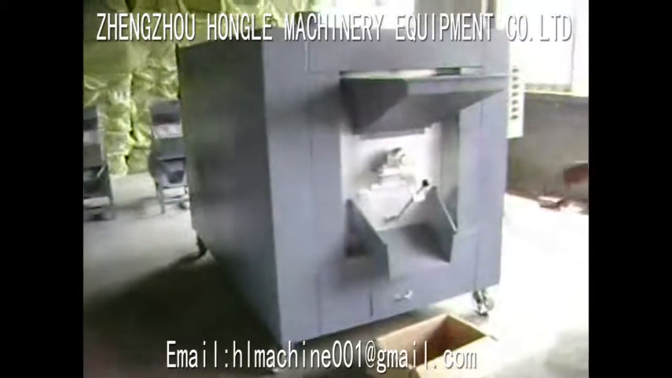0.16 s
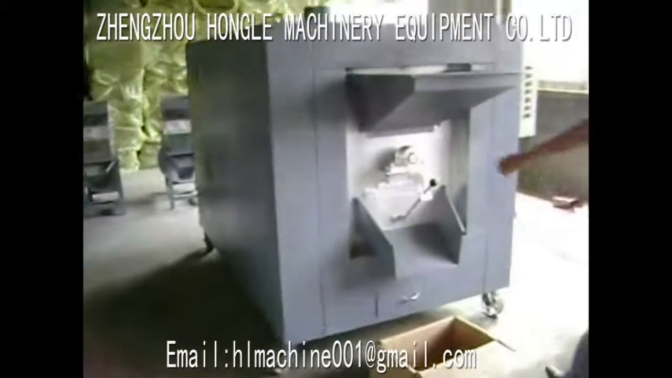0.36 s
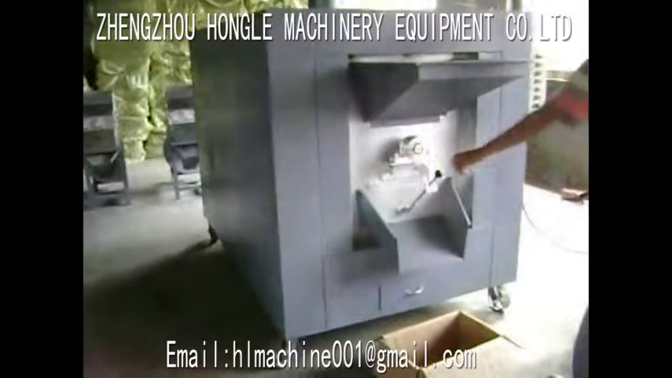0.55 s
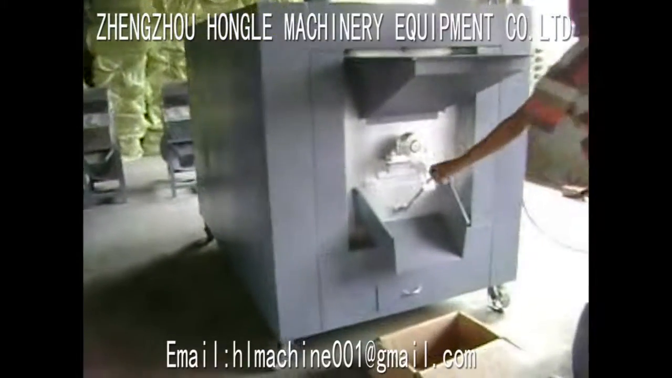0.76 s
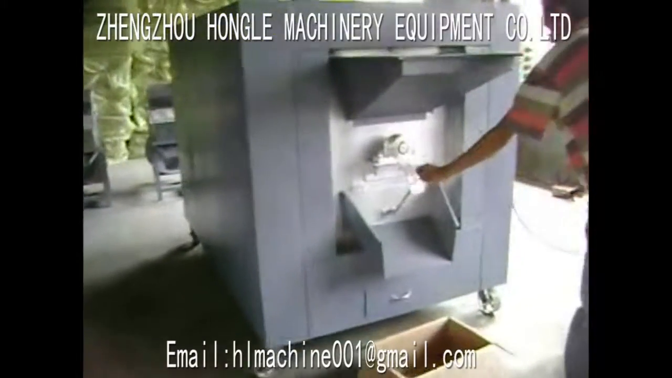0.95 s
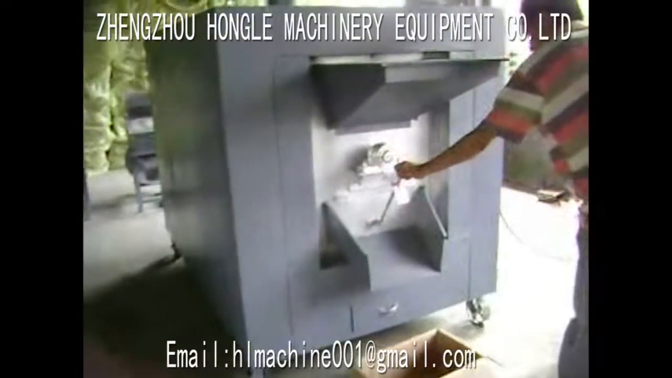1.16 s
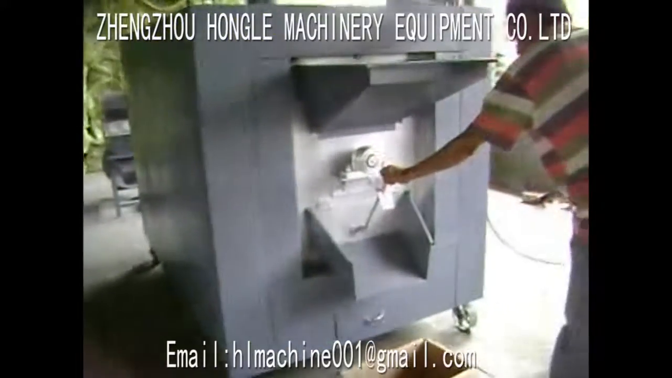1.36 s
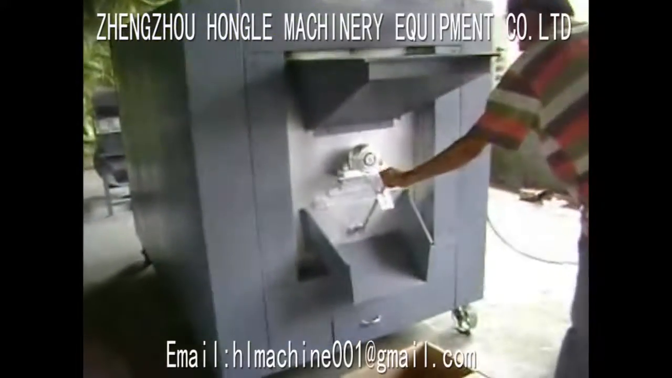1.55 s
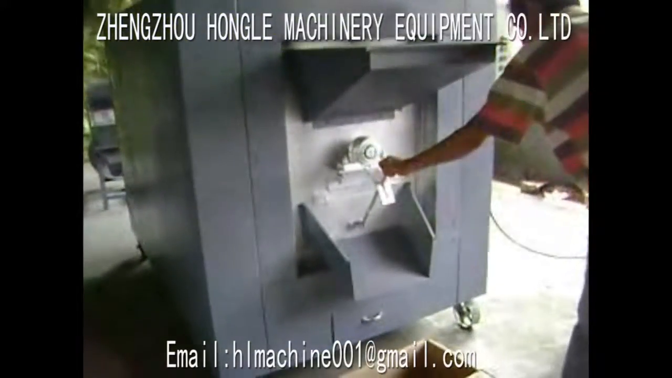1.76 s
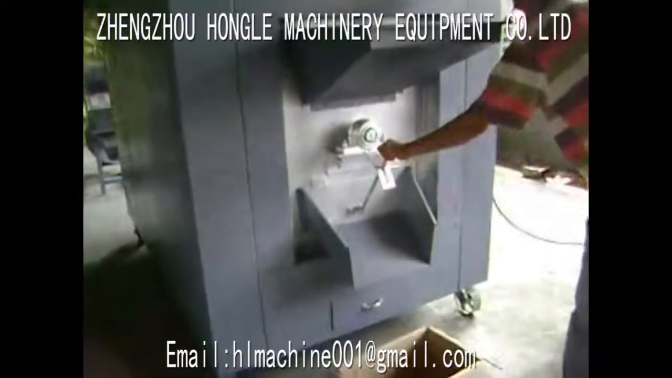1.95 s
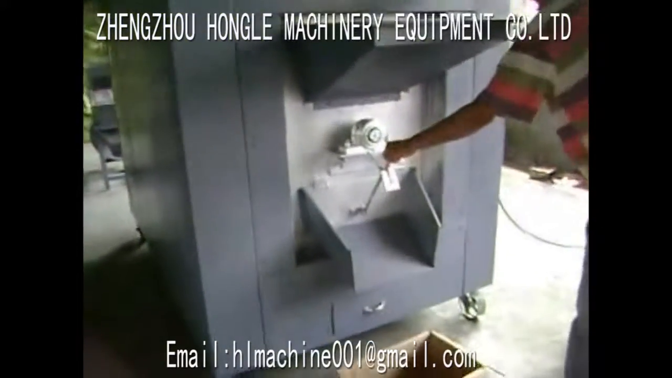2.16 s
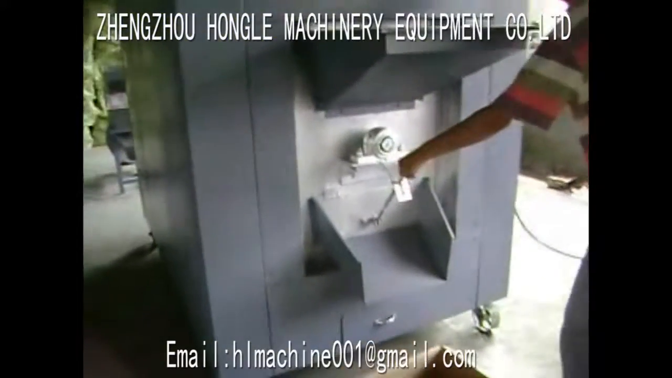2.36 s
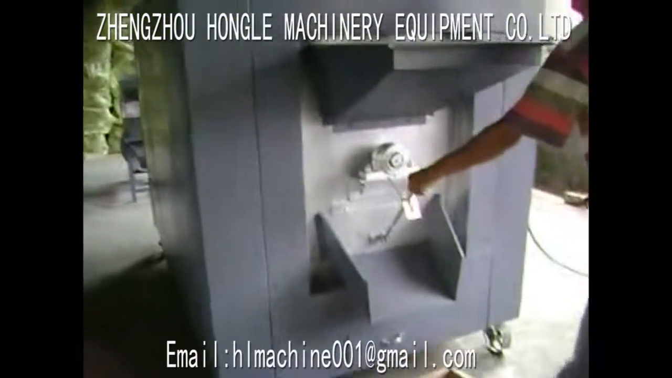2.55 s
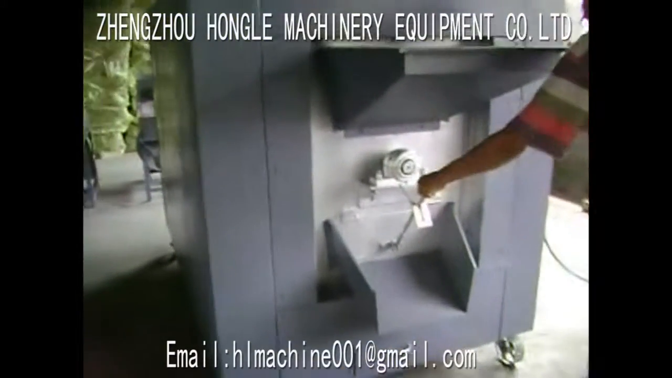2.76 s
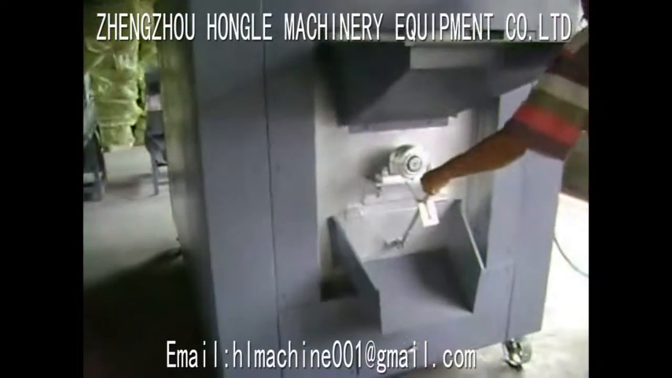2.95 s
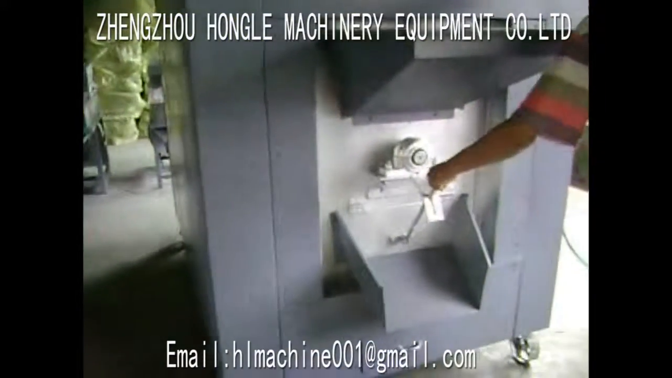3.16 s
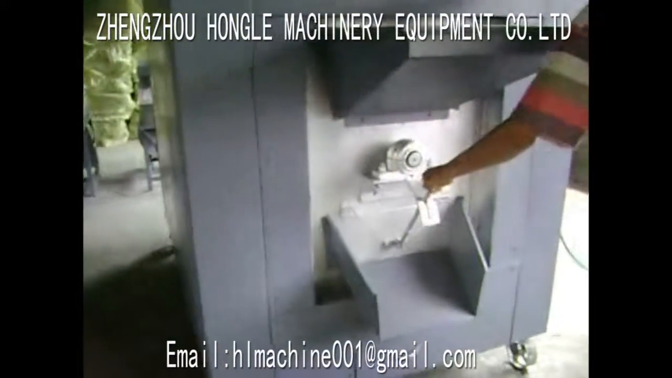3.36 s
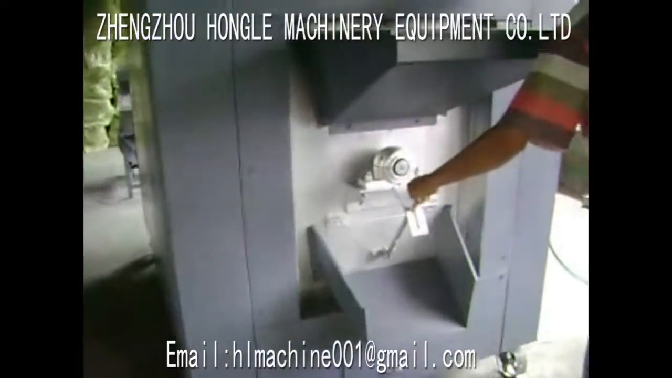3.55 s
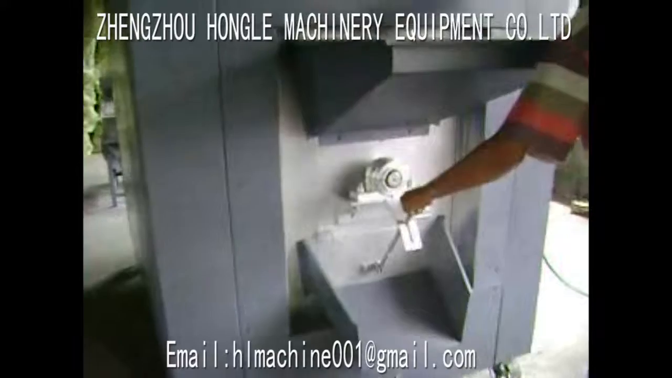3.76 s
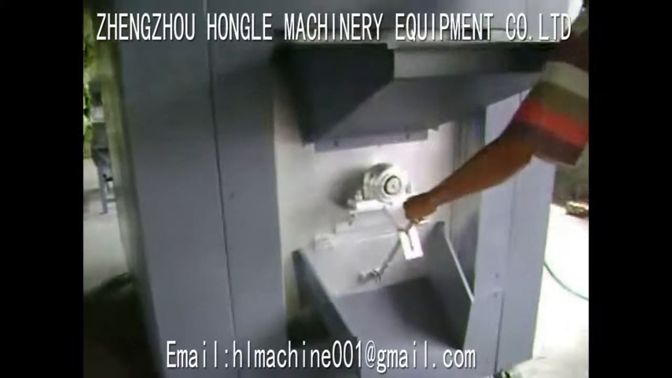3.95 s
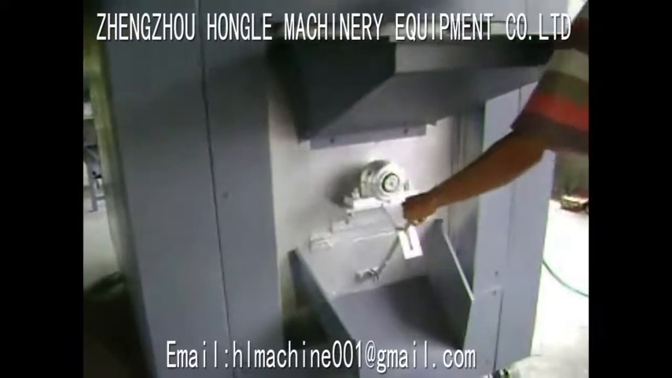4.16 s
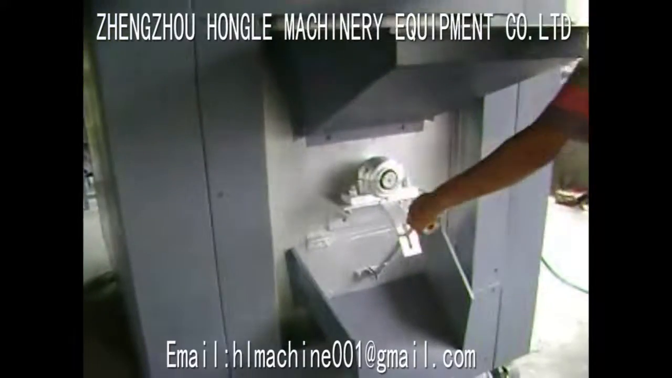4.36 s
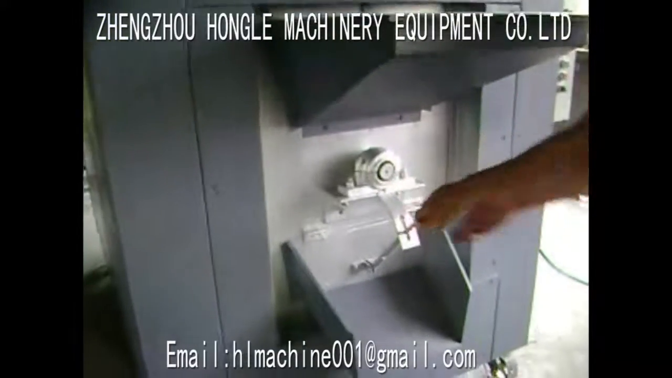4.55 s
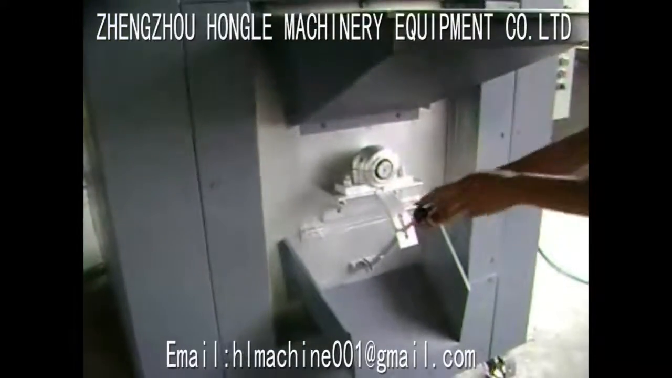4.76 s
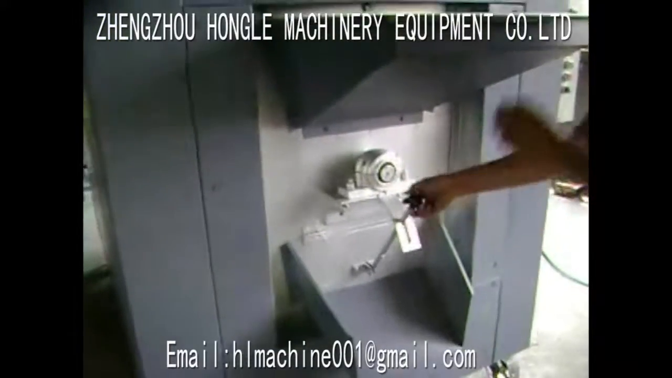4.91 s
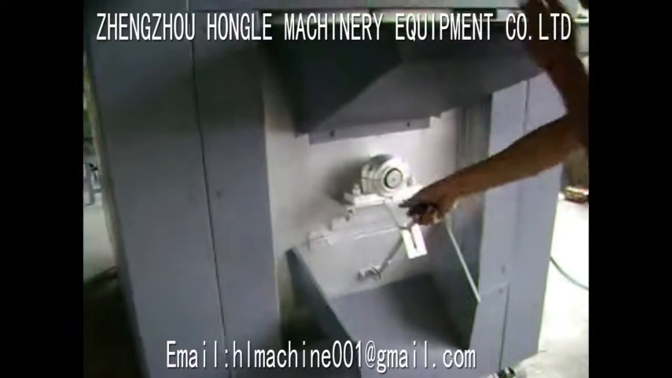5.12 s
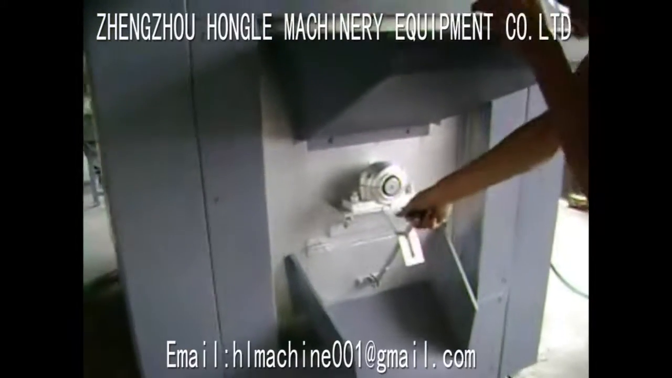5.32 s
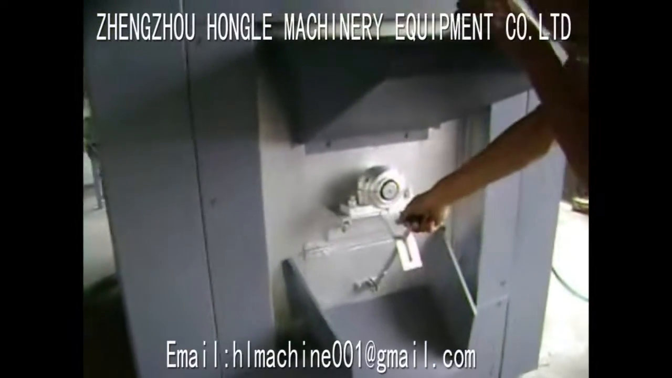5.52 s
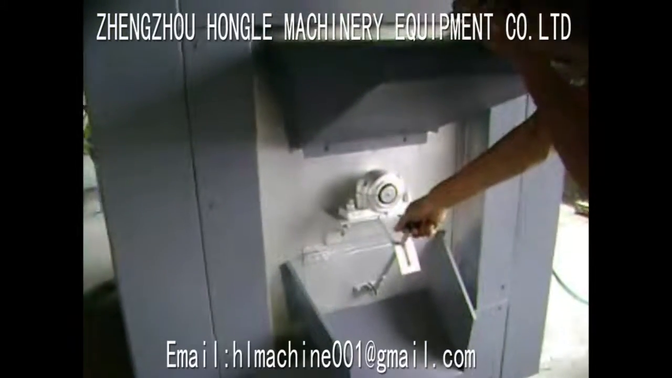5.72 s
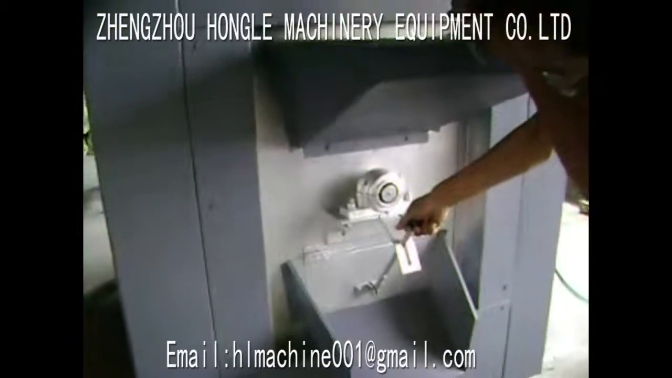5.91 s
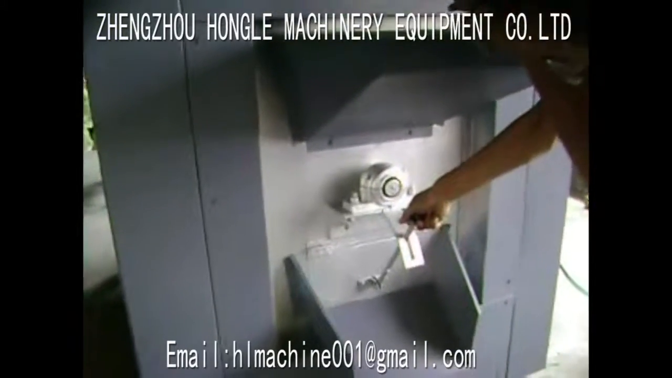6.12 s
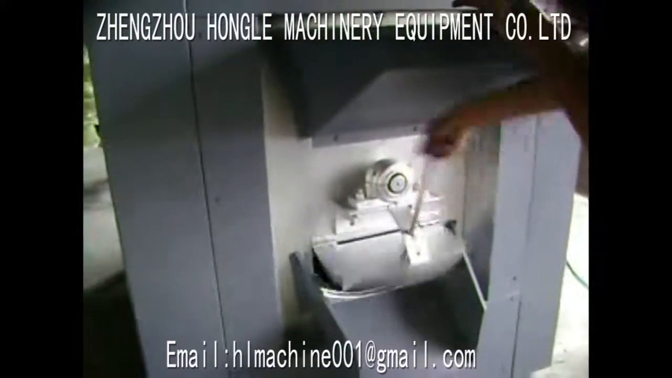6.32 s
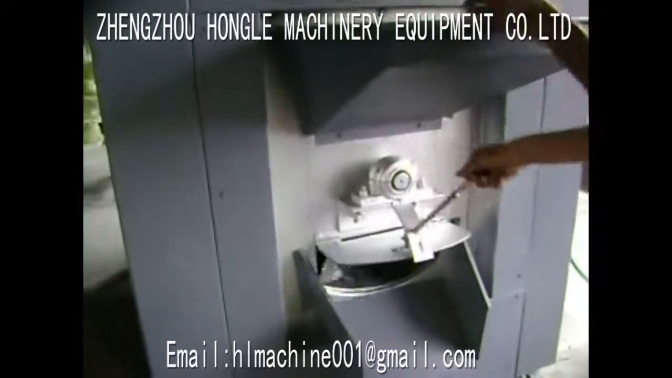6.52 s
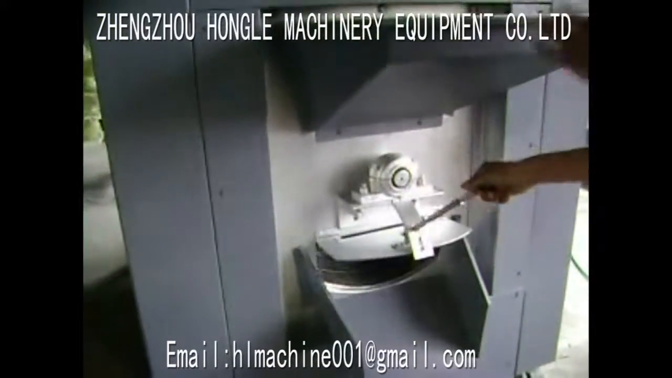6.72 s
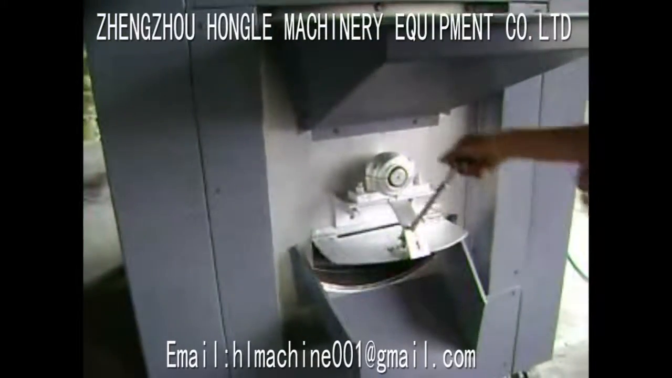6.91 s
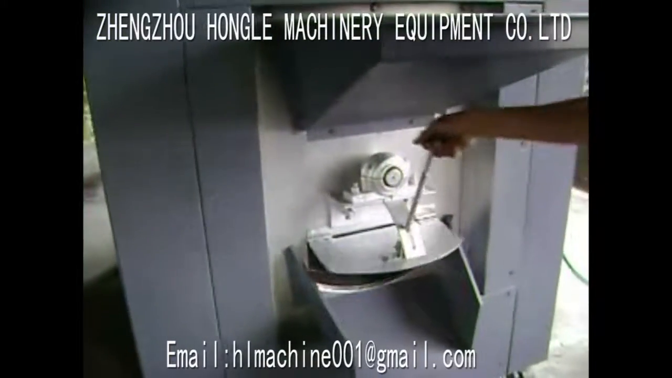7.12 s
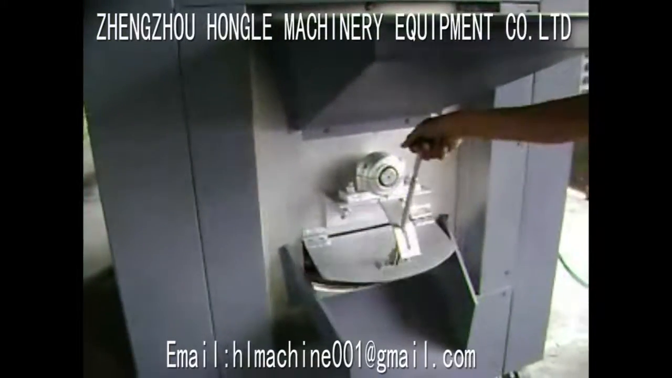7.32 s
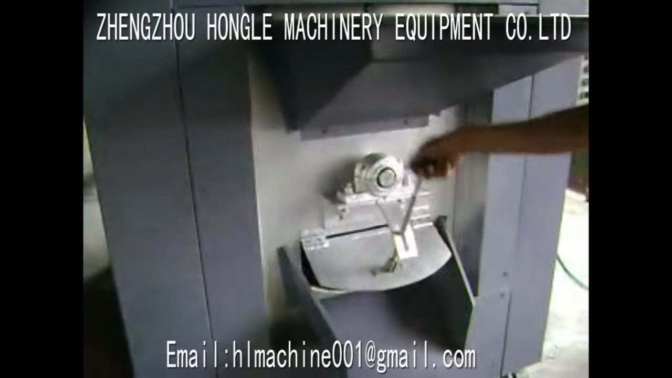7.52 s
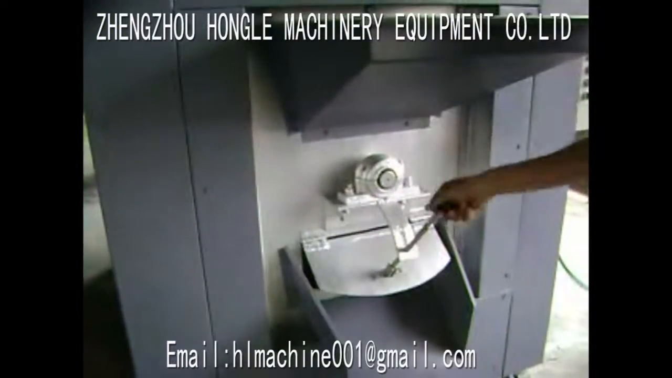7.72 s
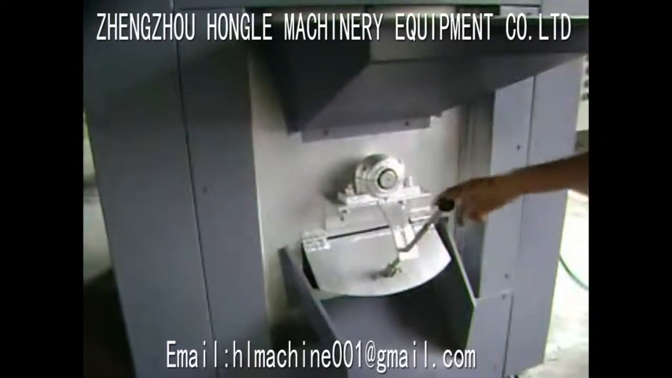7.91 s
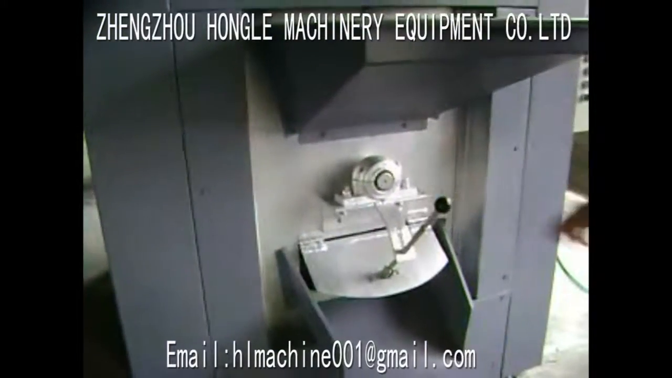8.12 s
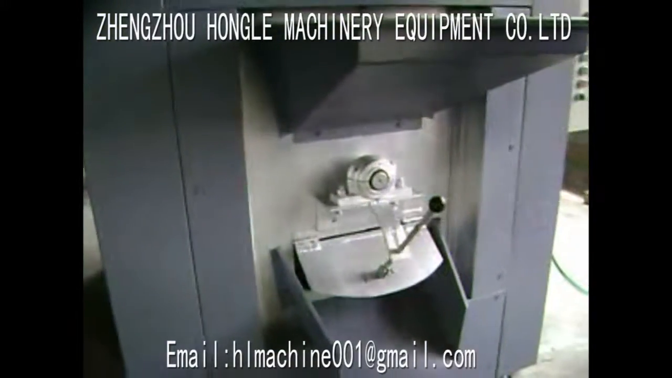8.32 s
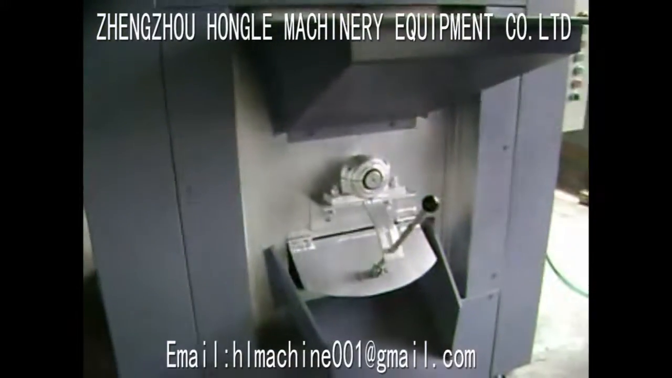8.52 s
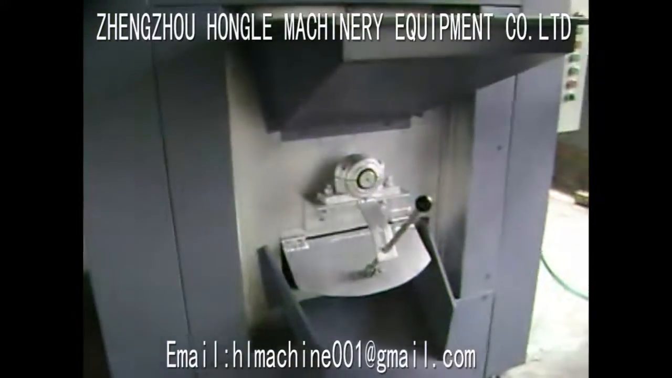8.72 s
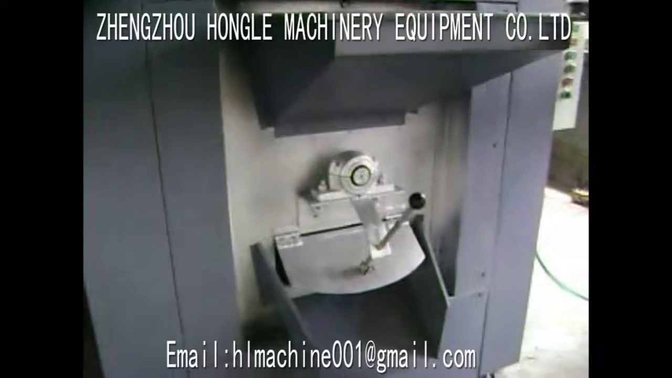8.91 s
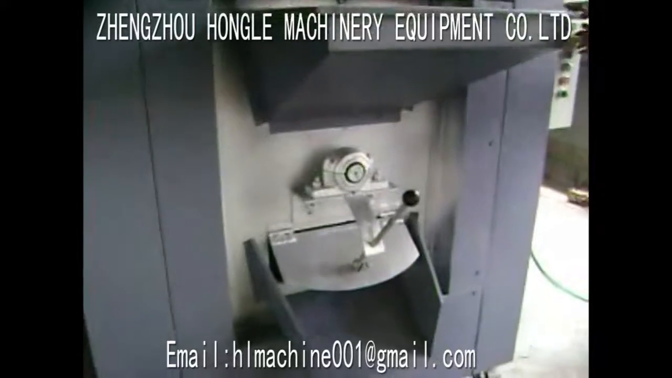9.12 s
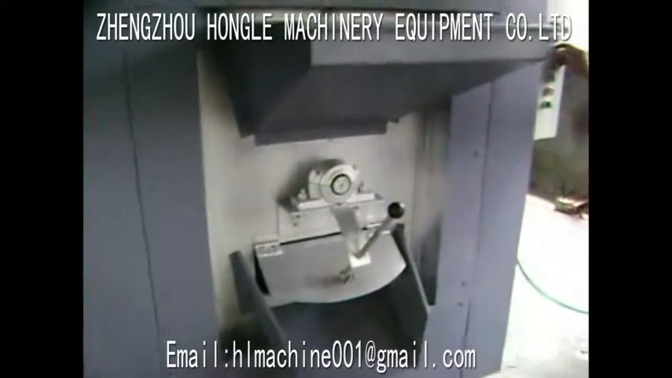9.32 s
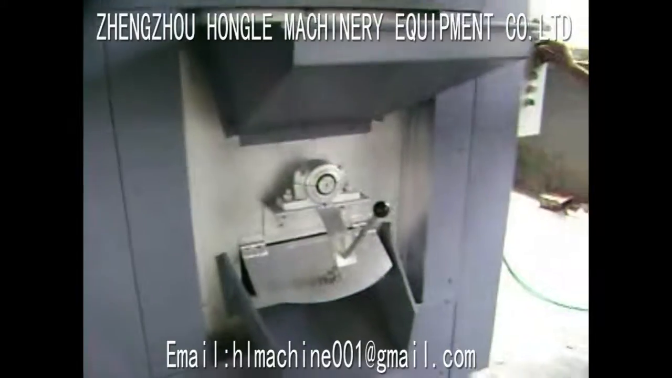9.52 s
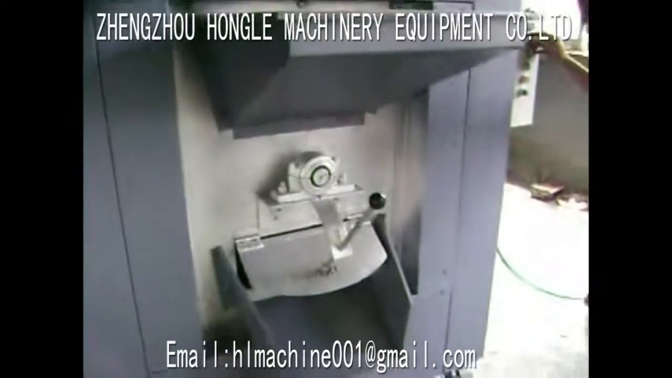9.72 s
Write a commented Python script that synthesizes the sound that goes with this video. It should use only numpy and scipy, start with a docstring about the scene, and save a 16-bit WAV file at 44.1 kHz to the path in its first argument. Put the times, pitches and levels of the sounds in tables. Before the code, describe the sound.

Steady machine drone with gear whine and dry rustling; scattered metallic lever knocks, then a loud screeching hatch opening and a clanking close.

```python
"""A drum nut roaster hums and whines in a workshop while its drum rumbles and rustles.
Lever knocks ring on the steel front; the hatch screeches open, groans on its hinge and bangs shut.
Sine partials make motor and gears, filtered noise the drum, noise and decaying modes the blows.
Pitched stick-slip tones make the rubs; a small, dull microphone overloads on the loudest blows."""
import sys
import numpy as np
from scipy import signal
from scipy.fft import rfft, irfft, next_fast_len
from scipy.io import wavfile

SR = 44100
rng = np.random.default_rng(int(sys.argv[2]) if len(sys.argv) > 2 else 0)


def store_wav(level_fs):
    """Save 16-bit WAV to argv[1]."""
    pcm = np.round(np.clip(np.atleast_2d(level_fs), -1, 1) * 32767)
    wavfile.write(sys.argv[1], SR, pcm.T.astype(np.int16))


N = 435266
TIME = np.arange(N) / SR

# The machine grows louder as the microphone comes near. Each row: time in seconds, gain in dB.
APPROACH = [(0, -8.5), (1.2, 0)]
# Relative noise colour of the steel plate. Each row: frequency in Hz, density in dB per Hz.
PLATE = [(30, -23.5), (130, -10), (370, -3.5), (440, -7), (520, 1.5), (750, 0.5), (1000, -1), (1250, 2.5),
         (1550, -11), (1950, -2), (2700, -4), (3200, -10), (4100, -9.5), (5200, -14.5), (6500, -22)]


def amp(db):
    """Decibels to gain."""
    return 10 ** (np.asarray(db) / 20)


def evened(x):
    """Scales x to an rms of 1."""
    return x / np.sqrt(np.mean(x ** 2) + 1e-20)


def read(points, hz):
    """A spectrum joined by straight lines on a log-frequency axis."""
    f, value = np.transpose(points)
    return np.interp(np.log(hz + 1), np.log(f + 1), value)


def curves(rows, t=TIME):
    """Every column of a table after its times, joined by straight lines."""
    s, *columns = np.transpose(rows)
    return [np.interp(t, s, c) for c in columns]


def add(mix, s, sound):
    """Mixes a sound in at s seconds."""
    part = mix[round(s * SR):][:len(sound)]
    part += sound[:len(part)]


def coloured(x, colour):
    """Filters x by a function that gives dB for each frequency."""
    size = next_fast_len(len(x) + 4096)
    gain = amp(colour(np.fft.rfftfreq(size, 1 / SR)))
    return irfft(rfft(x, size) * gain, size)[:len(x)]


def drift(rate, size=N):
    """Smooth chance of rms about 1: a new random knot rate times a second."""
    knots = rng.standard_normal(8192)
    joined = np.interp(np.arange(size) / SR * rate, np.arange(len(knots)), knots)
    return joined * np.sqrt(3 / 2)  # makes up for the rms lost between knots


def casing(hz):
    """The lift in dB that the casing's resonances give."""
    # Resonances of the casing. Each row: frequency in Hz, width in Hz, lift in dB.
    resonances = [(372, 30, 2), (520.3, 23, 13), (660, 120, 4), (755, 34, 4.5), (1218, 71, 6),
                  (2243, 590, 4)]
    return sum(db / (1 + (2 * (hz - f) / width) ** 2) for f, width, db in resonances)


def partial(turns, k, db, waver_db, smear):
    """One line of a rotating part, wavering in level and phase."""
    level = amp(db + waver_db * drift(6.6)) * np.sqrt(2)
    phase = 2 * np.pi * (k * turns + rng.random()) + smear * drift(14)  # smear in radians
    return level * np.sin(phase)


def hum_noise(width_hz=22):
    """A faint narrow band of noise in the hum, between about 280 and 350 Hz."""
    # Each row: time in seconds, level in dB before a 3.5 dB trim, centre of the band in Hz.
    band = [(0, -58, 330), (1.25, -29, 287.6), (1.8, -42.5, 278), (4.0, -41, 298), (6.2, -38.5, 335),
            (6.9, -33, 354), (8.7, -30.5, 346), (9.87, -39, 350)]
    db, hz = curves(band)
    lowpass = signal.butter(2, width_hz, fs=SR, output="sos")
    narrow = signal.sosfilt(lowpass, rng.standard_normal((2, N)))
    turn = np.exp(2j * np.pi * np.cumsum(hz) / SR)  # carries the slow noise up to the band
    return amp(db - 3.5) * evened(((narrow[0] + 1j * narrow[1]) * turn).real)


def motor():
    """A deep hum that beats as the motor slips against the mains, and weaker shaft orders."""
    # Deep hum. Each row: multiple of the shaft rate, level in dB before beating, beat depth 0-1.
    deep_partials = [(2, -45, 0.6), (4, -48.5, .5)]
    # Shaft orders. Each row: multiple of the shaft rate, level in dB once the microphone is near.
    shaft_orders = [(6, -51.5), (7, -47), (8, -48), (10, -46), (11, -48.5), (12, -47), (13, -60.5),
                    (14, -52.5), (15, -48.5)]
    shaft_hz, beat_s, first_beat_s = 24.9, 2.33, .72
    turns = shaft_hz * TIME
    beat = np.cos(2 * np.pi * (TIME - first_beat_s) / beat_s)
    deep = sum((1 + depth * beat) * partial(turns, k, db, waver_db=2.5, smear=.15)
               for k, db, depth in deep_partials)
    orders = sum(partial(turns, k, db, waver_db=4.0, smear=0.35) for k, db in shaft_orders)
    return deep + amp(curves(APPROACH)[0]) * orders


def gears(turns):
    """The whine of meshing teeth: two low partials, two that sing, and a set of weaker ones."""
    # Weaker partials. Each row: multiple of the tooth rate, mean level in dB.
    weak_partials = [(6, -39), (9, -45.5), (13, -59), (15, -41), (18, -46.5), (19, -54.5)]
    # The fifth partial growls. Each row: time in seconds, level in dB.
    growl = [(0.0, -32), (0.87, -41.5), (2.32, -30.5), (2.87, -42.5), (3.69, -27), (4.07, -42),
             (4.22, -29.5), (6.34, -39.5), (6.59, -34), (7.31, -37), (9.85, -44.5)]
    # Two partials sing in the casing, swelling and fading as the microphone moves.
    # Each row: time in seconds, level in dB.
    whine_16th = [(0.0, -33), (0.2, -28), (0.82, -32.5), (0.97, -45), (1.62, -25), (1.9, -31),
                  (2.07, -27.5), (3.47, -42), (3.87, -28), (4.22, -44.5), (4.74, -30), (5.29, -42.0),
                  (7.08, -30.5), (7.31, -45), (9.08, -31.5), (9.85, -53)]
    # Each row: time in seconds, level in dB.
    whine_17th = [(0.0, -34), (0.42, -49), (0.72, -29.5), (1.15, -46.5), (3.09, -34), (3.72, -42.0),
                  (5.09, -31.5), (5.86, -41.5), (6.36, -29), (6.73, -40), (7.078, -24), (9.2, -45.5),
                  (9.5, -35), (9.85, -47)]
    fourth = partial(turns, 4, -40, waver_db=6, smear=.7)
    fifth = partial(turns, 5, curves(growl)[0], waver_db=1.5, smear=0.14)
    singing = sum(partial(turns, k, curves(level)[0], waver_db=.9, smear=.08)
                  for k, level in ((16, whine_16th), (17, whine_17th)))
    weak = sum(partial(turns, k, db, waver_db=2, smear=0.77) for k, db in weak_partials)
    return fourth + fifth + singing + weak


def drum_levels():
    """Gains of the rumble and the rustle: a bed with swells, summed as power."""
    # Swells of the rumble and of the dry rustle from the drum. Each row: crest in seconds,
    # rise in seconds, fall in seconds, rustle swell in dB, rumble swell in dB.
    swells = [(.4, 0.23, 0.63, -30.5, -29), (1.7, 0.21, 0.24, -31, -27), (3.2, 0.7, 0.14, -31.5, -38),
              (3.88, 0.097, 0.11, -28, -36), (4.95, 0.3, 0.56, -30.5, -32.5),
              (6.52, .06, 0.29, -27.5, -26.5), (7.38, 0.24, 0.35, -21.5, -22.5), (7.9, .16, .22, -25, -38),
              (8.59, 0.11, 0.11, -20.5, -25.5), (9.77, 0.18, 0.23, -20, -26.5)]
    rumble_db, rustle_db = -26, -30
    nearing_share = 0.32  # how much of the approach the rumble bed follows
    unlatch_s, unlatched_db = 6.33, 3  # more rustle gets out once the hatch is unlatched
    rumble_power = amp(rumble_db + nearing_share * curves(APPROACH)[0]) ** 2
    rustle_power = amp(rustle_db + unlatched_db * (TIME > unlatch_s)) ** 2
    for crest, rise, fall, rustle_swell_db, rumble_swell_db in swells:
        swell = np.exp(-((TIME - crest) / np.where(TIME < crest, rise, fall)) ** 2)
        rumble_power = rumble_power + swell * amp(rumble_swell_db) ** 2
        rustle_power = rustle_power + swell * amp(rustle_swell_db) ** 2
    return np.sqrt(rumble_power), np.sqrt(rustle_power)


def drum(turns, chatter=0.09, throb=0.063, flutter_db=2.0, lump_db=1.2, wander_db=-0.13):
    """The drum rumbles and gives a dry rustle; each gear tooth shakes both a little."""
    # Relative colour of the rumble. Each row: frequency in Hz, density in dB per Hz.
    rumble_colour = [(20, -6), (50, -7.5), (110, -2.5), (190, -2.5), (330, -3.5), (440, -3), (700, 1),
                     (1000, 2.5), (1280, 1), (1450, -5.5), (1750, -8.5), (2600, -16), (6000, -24.5)]
    # Relative colour of the rustle. Each row: frequency in Hz, density in dB per Hz.
    rustle_colour = [(100, -11), (500, -7.5), (1500, 1), (2000, 2.5), (2400, 6), (2600, 2.5), (2850, 3.5),
                     (3150, 1), (4400, 0), (5300, -4), (6500, -13.5)]
    rumble_gain, rustle_gain = drum_levels()
    tooth = np.cos(2 * np.pi * turns)
    shake = rng.standard_normal(N) * (1 + chatter * tooth) * amp(lump_db * drift(35))
    rumble = evened(coloured(shake, lambda hz: read(rumble_colour, hz) + casing(hz)))
    tooth_throb = 1 + throb * (tooth + np.cos(4 * np.pi * turns))
    rough = rng.standard_normal(N) * amp(flutter_db * drift(700)) * tooth_throb
    rustle = evened(coloured(rough, lambda hz: read(rustle_colour, hz) + casing(hz)))
    return rumble_gain * rumble + rustle_gain * amp(wander_db * drift(5)) * rustle


def clunk(db, hz, t60, octaves=0.33, rise_s=.0012):
    """A hollow clunk farther off: noise in one broad resonance that dies away."""
    t = np.arange(SR // 2) / SR
    noise = rng.standard_normal(len(t))
    hollow = coloured(noise, lambda f: -20 * np.log10(1 + (np.log2((f + 1) / hz) / octaves) ** 4))
    return amp(db - 60 * t / t60) * (1 - np.exp(-t / rise_s)) * evened(hollow)


def scuff(length, db, grit_db=3):
    """The lever scuffs over the steel: a short gritty stroke that sounds through the plate."""
    size = round(length * SR)
    grit = rng.standard_normal(size) * amp(grit_db * drift(150, size))
    stroke = evened(coloured(grit, lambda hz: read(PLATE, hz)))
    return amp(db) * stroke * signal.windows.tukey(size, .5)


def rub(rows, tone, jitter):
    """Uneven stick and slip: a pitched squeal, and a scrape through the plate at each slip."""
    t = np.arange(rows[0][0], rows[-1][0], 1 / SR)
    hz, squeal_db, scrape_db = curves(rows, t)
    turns = np.cumsum(hz * (1 + jitter * drift(217.4, len(t)))) / SR
    squeal = evened(sum(amp(db) * np.sin(2 * np.pi * k * turns) for k, db in tone))
    slips = rng.standard_normal(len(t)) * (1 + .3 * np.cos(2 * np.pi * turns))
    scrape = evened(coloured(slips, lambda hz: read(PLATE, hz) + 0.69 * casing(hz)))
    return rows[0][0], amp(squeal_db) * squeal + amp(scrape_db) * scrape


def knock(level_db, treble_db, bass_db, ring_hz, t60, modes_db=-3, crack_db=3, crack_s=0.007,
          favour_db=11, rise_s=0.0015):
    """A crack, the dense ring of the plate and its modes; the place of the blow favours some modes."""
    # Modes of the steel front. Each row: frequency in Hz, relative level in dB, t60 in seconds.
    steel_modes = [(371, -14, 0.25), (507.3, -4.5, 0.14), (547.5, -6, 0.15), (628.5, -6, 0.22),
                   (733, -4.5, 0.25), (799.4, -5, 0.15), (1062, -9.5, 0.25), (1232, -2.5, 0.12),
                   (1404, -10.5, 0.16), (1930, -10, 0.25), (2125, -4, 0.1), (2530, -8.5, .14),
                   (2530, -15, 0.068), (3375, -11, 0.077), (4380, -17, 0.092), (4800, -13, 0.13)]
    t = np.arange(SR // 2) / SR
    tilt = [(380, bass_db), (760, 0), (1300, 0), (2200, treble_db + 8.0)]  # (Hz, dB)
    ring_and_crack = amp(-60 * t / max(t60, .02)) + amp(crack_db) * np.exp(-t / crack_s)
    burst = rng.standard_normal(len(t)) * ring_and_crack
    dense = coloured(burst, lambda hz: read(PLATE, hz))
    modes = np.zeros(len(t))
    for hz, db, ring_s in steel_modes:
        lift_db = favour_db / (1 + ((hz - ring_hz) / 50) ** 2)
        decay = amp(db + lift_db - 60 * t / ring_s)
        modes += rng.choice([-1, 1]) * decay * np.sin(2 * np.pi * hz * t)
    blow = coloured(evened(dense) + amp(modes_db) * evened(modes), lambda hz: read(tilt, hz))
    blow = blow * (1 - np.exp(-t / rise_s))
    return amp(level_db) * blow / np.std(blow[:SR // 50])  # level over the first 20 ms


def workshop(x):
    """Sparse reflections of random sign, each band dying at its own speed."""
    # Decay of the room. Each row: frequency in Hz, t60 in seconds.
    room = [(100, 0.94), (600, 0.83), (2500, 0.34), (6500, 0.34)]
    taps = rng.choice([-1., 1.], SR) * (rng.random(SR) < 2500 / SR)  # about 2500 a second
    taps = taps * (TIME[:SR] > .009)  # no reflection in the first 9 ms
    hz, t, bands = signal.stft(taps, SR, nperseg=256)
    tail = signal.istft(bands * amp(-60 * t / read(room, hz)[:, None]), SR, nperseg=256)[1]
    return signal.fftconvolve(x, tail / np.linalg.norm(tail))[:N]


def scene():
    """The running machine, the work at its hatch and the workshop's echo."""
    # Blows of the lever and hatch. Each row: start in seconds, level in dB before a 10.5 dB trim,
    # treble in dB before an 8 dB lift, bass in dB, most favoured ring in Hz, ring t60 in seconds.
    knocks = [(1.113, 6, -0.5, 0.5, 720, 0.18), (1.131, -1, -3, 6.5, 513, 0.24),
              (2.156, -10.5, -8, 1, 520, 0.28), (2.727, 0.5, -7.5, 4, 1250, .16),
              (3.228, -1.5, -9.5, -6, 627, 0.28), (3.245, -5, -17, -4, 745, 0.28),
              (3.895, 0, -12, 7.5, 577, 0.17), (4.076, -10.5, -9, 1, 1250, 0.2),
              (5.021, 2.5, -5.5, 1, 505, 0.22), (5.225, -2.5, -6, 2.5, 510, 0.086),
              (5.308, -4.5, -7, 1.5, 960, 0.12), (6.327, 3, -11.5, 8, 566, 0.28),
              (6.333, 3, -4, 6, 750, 0.32), (6.367, 0, -9, -3, 726, 0.28), (6.411, 11, -8.5, 5, 545, 0.16),
              (6.506, 0, -12, 6, 545, 0.2), (6.532, -5, -24, 11, 540, 0.53),
              (7.543, 5, -12, -4.5, 1220, 0.18), (7.551, 1.5, -16, 1, 1225, 0.19),
              (7.556, 2.5, -17, -11, 797, .2), (7.584, -2, 0, -7, 2050, 0.1),
              (7.632, -7.5, -12.5, -0.5, 630, 0.18), (7.747, -0.5, -15.5, -11, 1166, 0.11),
              (7.761, -4.5, -11, -1, 635, .14)]
    # Hollow clunks. Each row: start in seconds, level in dB, pitch in Hz, t60 in seconds.
    clunks = [(.520, -12, 960, 0.31), (3.16, -20.5, 1100, 0.26), (4.773, -18, 840, 0.41),
              (8.81, -17, 836, 0.33)]
    # Lever scuffs. Each row: start in seconds, length in seconds, level in dB.
    scuffs = [(1.028, 0.062, -23), (1.62, 0.23, -27.5), (2.421, 0.22, -28), (3.842, 0.038, -20)]
    # Three rubs of steel on steel.
    # Each row: time in seconds, pitch in Hz, squeal level in dB, scrape level in dB.
    screech = [(6.327, 744.5, -9, -20), (6.35, 740.4, -13, -10.5), (6.38, 747, -11, -7),
               (6.43, 733.7, -0.5, -7), (6.493, 722.5, -4.5, -13), (6.503, 704, -23, -12.5),
               (6.66, 730, -33, -37)]
    # Each row: time in seconds, pitch in Hz, squeal level in dB, scrape level in dB.
    groan = [(7.13, 133.5, -53, -51), (7.19, 130.7, -26, -20), (7.3, 129.7, -22, -30.5),
             (7.37, 129.5, -23.5, -28), (7.44, 127.9, -34, -33), (7.52, 132, -30.5, -38),
             (7.7, 140.1, -34.5, -41), (7.9, 152, -40, -42)]
    # Each row: time in seconds, pitch in Hz, squeal level in dB, scrape level in dB.
    squeak = [(7.575, 700, -29, -31), (7.585, 701, -6, -26), (7.592, 686, -6, -24), (7.604, 680, -29, -34)]
    # Overtones of the rubs. Each row: multiple of the pitch, relative level in dB.
    screech_tone = [(1, -5), (2, -25), (3, -23.5), (4, -33)]
    # Each row: multiple of the pitch, relative level in dB.
    groan_tone = [(1, 1), (2, -0.5), (3, -8.5), (4, -16), (5, -15.5), (6, -5), (7, -26)]
    # Each row: multiple of the pitch, relative level in dB.
    squeak_tone = [(1, -17), (2, -20.5), (3, 8), (4, -1.5), (5, -18), (6, -1)]
    mesh_hz = 133.9  # mean tooth rate, which drifts slightly
    turns = np.cumsum(mesh_hz * (1 + 0.00049 * drift(3))) / SR
    machine = hum_noise() + motor() + gears(turns) + drum(turns)
    blows, rubs = np.zeros(N), np.zeros(N)
    for s, *blow in clunks:
        add(blows, s, clunk(*blow))
    for s, *stroke in scuffs:
        add(rubs, s, scuff(*stroke))
    add(rubs, *rub(screech, screech_tone, jitter=0.034))
    add(rubs, *rub(groan, groan_tone, jitter=0.031))
    add(rubs, *rub(squeak, squeak_tone, jitter=0.026))
    for s, *blow in knocks:
        add(blows, s, amp(-10.5) * knock(*blow))
    echo = workshop(amp(-10.5) * blows + amp(-16.5) * rubs)
    return (machine + blows + rubs + echo)[None]


def record(dry, hardness=7):
    """A narrow-band microphone, overload with a firm knee, then the band limit."""
    # Upper edge of the microphone. Each row: frequency in Hz, gain in dB.
    mic_edge = [(5600, -1.5), (6100, -6.5), (6500, -13.5), (6900, -25), (7300, -54), (8000, -85)]
    dull = coloured(dry[0], lambda hz: read(mic_edge, hz))
    over = np.maximum(abs(dull) - (1 - 1 / hardness), 0)
    clipped = dull - np.sign(dull) * (over - np.tanh(hardness * over) / hardness)
    clipped = clipped * signal.windows.tukey(N, .001)  # very short fades at both ends
    band_limit = signal.firwin(255, 15300, window=("kaiser", 9), fs=SR)  # low-pass edge in Hz
    return signal.oaconvolve(clipped, band_limit, "same")[None]


dry = scene()
out = record(dry)
store_wav(out)
```